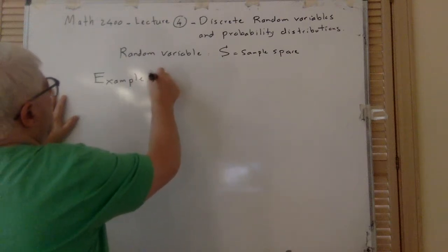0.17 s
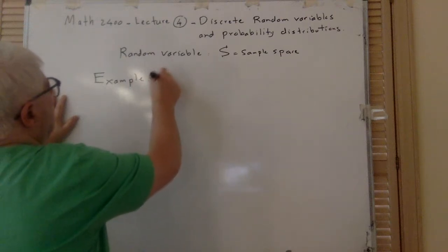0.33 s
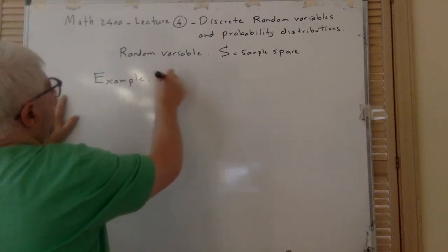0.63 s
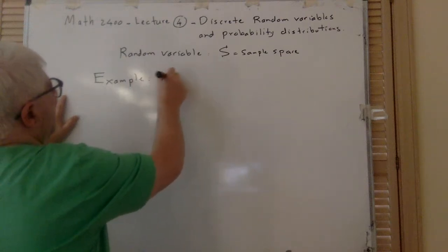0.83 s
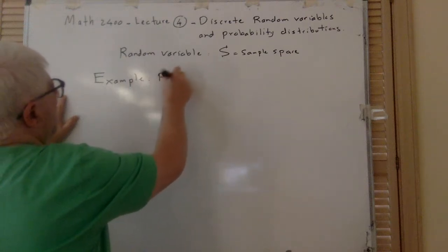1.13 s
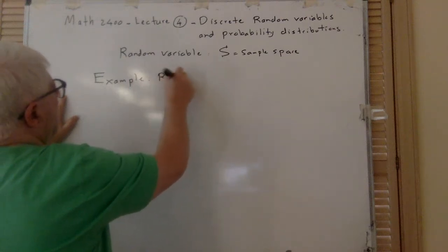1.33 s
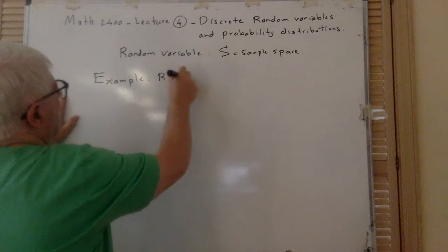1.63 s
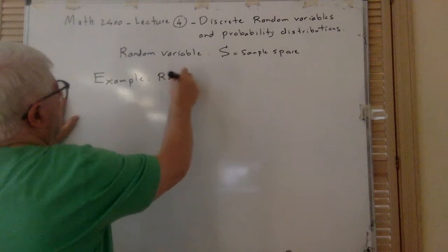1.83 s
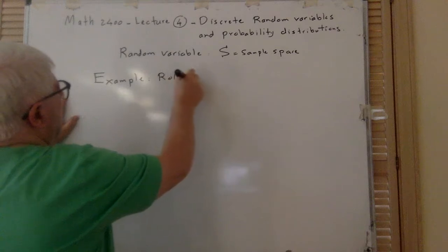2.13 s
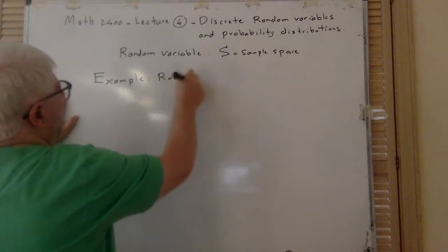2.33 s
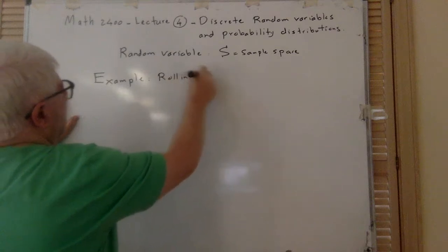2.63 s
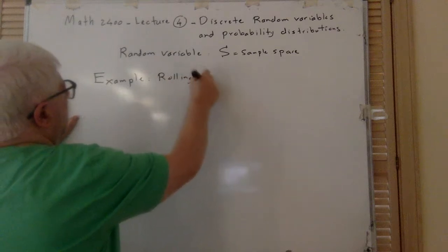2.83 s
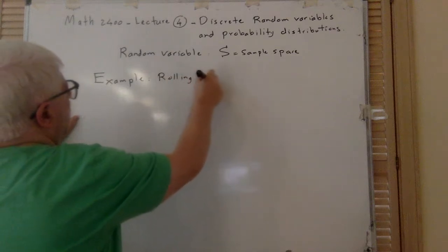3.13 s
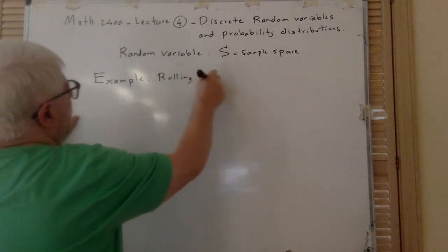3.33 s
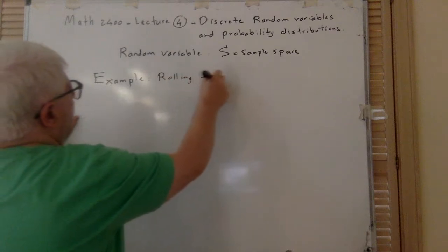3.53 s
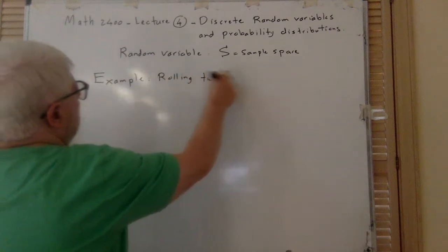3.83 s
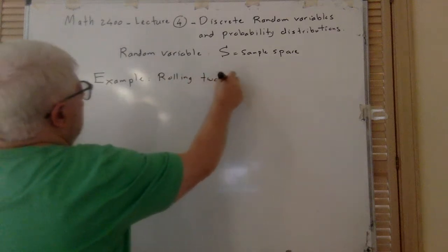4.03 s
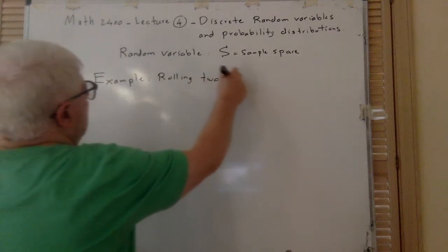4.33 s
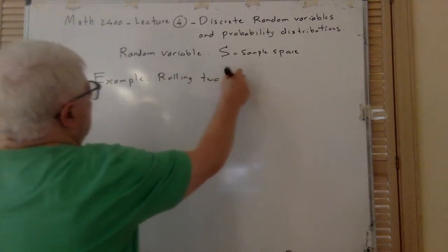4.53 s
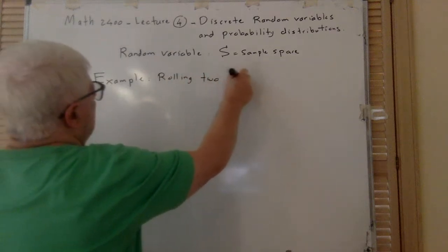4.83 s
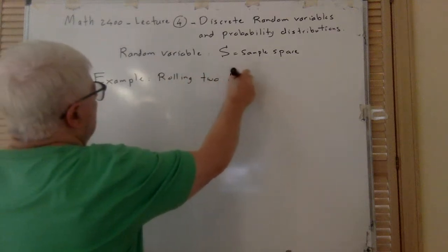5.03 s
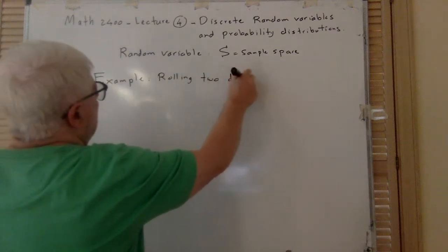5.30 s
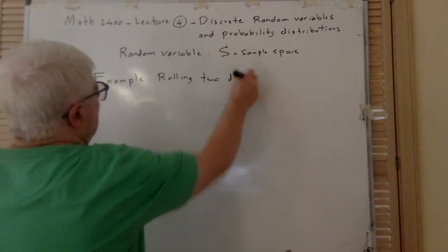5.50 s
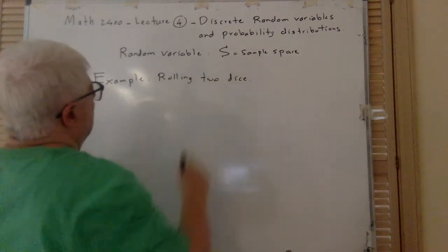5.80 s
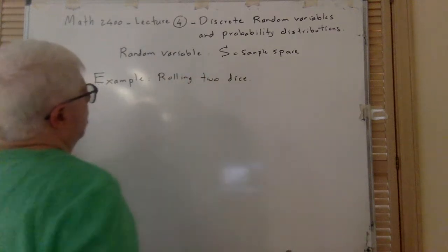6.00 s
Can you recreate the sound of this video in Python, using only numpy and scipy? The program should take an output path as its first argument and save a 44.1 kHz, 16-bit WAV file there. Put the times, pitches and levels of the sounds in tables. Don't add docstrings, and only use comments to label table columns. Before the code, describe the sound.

Soft then firmer marker taps knock a loose whiteboard, with brief scratchy strokes between, ending in a small plastic cap click.

```python
import sys
import numpy as np
from scipy import signal
from scipy.fft import rfft, irfft
from scipy.io import wavfile
from scipy.ndimage import uniform_filter1d

SR = 44100
rng = np.random.default_rng(int(sys.argv[2]) if len(sys.argv) > 2 else 0)


def to_wav(sig):
    pcm = np.clip(np.atleast_2d(sig), -1, 1) * 32767
    pcm = np.round(pcm).astype(np.int16)
    wavfile.write(sys.argv[1], SR, pcm.T)


def magnitude_from_level(level_db):
    exponent = np.asarray(level_db, float) / 20
    return 10 ** exponent


N = 271643

# start_s, thud_db, upper_modes_db, knock_db (frame, over the thud), fall_db_per_s
TAPS = [(0.179, -50, -36, -45, 70.5), (0.198, -45, -40, -47, 68), (0.626, -39, -19.5, -58, 57),
        (0.646, -43, -25, -30, 60), (0.983, -26.5, -25, -44, 72), (1.223, -27.5, -26, -41.5, 74),
        (1.457, -23, -19.5, -41.5, 60.5), (1.627, -34, -27, -34, 83), (1.774, -33, -30, -31, 59),
        (2.058, -57.5, -20.5, -32, 60), (2.662, -19, -21, -17.5, 39), (2.907, -22, -17, -38, 40),
        (3.084, -24, -22, -17, 45), (3.505, -38, -23, -30.5, 46), (3.958, -24, -18, -11, 42.5),
        (4.475, -41, -30.5, -28.5, 61), (4.678, -24, -17.5, -13.5, 43), (4.848, -27, -16, -8, 38),
        (5.093, -46, -15.5, -18, 19), (5.431, -22.5, -19, -11.5, 40)]


def colour(table, hz):
    rows = np.array(table, float)
    return [np.interp(np.log(hz), np.log(rows[:, 0]), column) for column in rows[:, 1:].T]


def shaped(x, db):
    hz = np.maximum(np.fft.rfftfreq(len(x), 1 / SR), 1)
    return irfft(rfft(x) * magnitude_from_level(db(hz)), len(x))


def unit(x):
    return x / np.sqrt(np.mean(x ** 2))


def band(x, lo_hz, hi_hz):
    sos = signal.butter(4, [lo_hz, min(hi_hz, .45 * SR)], "band", fs=SR, output="sos")
    return signal.sosfilt(sos, x)


def add(out, start_s, x):
    i = int(start_s * SR)
    out[i:i + len(x)] += x[:len(out) - i]


def ring(hz, t60_s, rise_s=.001, length_s=0.65):
    t = np.arange(int(length_s * SR)) / SR
    return np.sin(2 * np.pi * hz * t) * (1 - np.exp(-t / rise_s)) * magnitude_from_level(-60 * t / t60_s)


def walk(rate_hz):
    k = int(SR / rate_hz)
    steps = np.repeat(rng.standard_normal(N // k + 1), k)
    return unit(uniform_filter1d(uniform_filter1d(steps, k), k)[:N])


def breathe_db(t):
    quiet_db, swell_db, swell_s = -2.5, 5, 0.33
    opening = 0
    for start_s, db, _, knock_db, _ in TAPS:
        loudness = np.clip((db + knock_db + 74) / 35, 0, 1)
        opening = opening + loudness * (t > start_s) * np.exp(-np.abs(t - start_s) / swell_s)
    return quiet_db + swell_db * opening


def fan():
    # pitch_hz, level_db (per Hz)
    air_spectrum = [(20, -46.5), (50, 0), (80, -2), (130, 4.5), (240, -2.5), (350, -6.5), (560, -17),
                    (1100, -12.5), (2000, -20), (6800, -28.5), (7500, -38), (14200, -40), (15300, -57.5)]
    # pitch_hz, level_db
    hum_tones = [(120, -82), (240, -78), (481, -88)]
    t = np.arange(N) / SR
    air = unit(shaped(rng.standard_normal(N), lambda hz: colour(air_spectrum, hz)[0]))
    out = air * magnitude_from_level(-68 + 0.99 * walk(2) + breathe_db(t))
    for hz, db in hum_tones:
        out = out + magnitude_from_level(db + 4.0 + 2.0 * walk(5.1)) * np.sin(2 * np.pi * hz * t)
    return out


def tail(wet_db, build_s):
    # pitch_hz, t60_s, level_db
    room_decay = [(93, 0.57, 0), (300, 0.64, -2), (1000, 0.72, 10), (2950, 0.52, 7.5), (7760, 0.92, -17.5)]
    t = np.arange(int(.9 * SR)) / SR
    out = np.zeros(len(t))
    for hz in 57.86 * 2. ** np.arange(8):
        t60_s, db = colour(room_decay, hz)
        octave = band(rng.standard_normal(len(t)), hz / np.sqrt(2), hz * np.sqrt(2))
        out += octave * magnitude_from_level(wet_db + db - 60 * t / t60_s)
    return out * (1 - np.exp(-(t / build_s) ** 2))


def room(x, echoes):
    return x + signal.fftconvolve(x, echoes)[:len(x)]


def stroke_db():
    # start_s, hold_s, hiss_db, fade_db_per_s
    strokes = [(0.415, 0.059, -71.5, 62), (0.665, .02, -69, 59), (.99, 0.043, -73, 70),
               (1.25, .05, -73.5, 75), (1.486, .06, -68.5, 24), (2.662, 0.017, -59.5, 48.5),
               (2.915, 0.24, -65, 51), (3.51, 0.04, -78, 49), (3.966, 0.19, -62.5, 68),
               (4.69, 0.15, -65, 90), (4.853, 0.024, -61.5, 34), (5.448, 0.13, -60.5, 47),
               (5.975, 0.11, -67.5, 49), (6.096, .06, -55.5, 60)]
    rest_db, rise_s = -80.5, 0.018
    t, power = np.arange(N) / SR, magnitude_from_level(2 * rest_db)
    for start_s, hold_s, db, fade_db in strokes:
        rise = np.clip((t - start_s) / rise_s, 0, 1)
        fade = magnitude_from_level(db - fade_db * np.maximum(t - start_s - hold_s, 0))
        power = power + (rise * fade) ** 2
    return 10 * np.log10(power)


def felt():
    hiss_db = stroke_db()
    air_db = -83 + 0.58 * (hiss_db + 60.5)
    hiss = unit(band(rng.standard_normal(N), 2620, 6510)) * magnitude_from_level(hiss_db - 9.5 + 1.3 * walk(40))
    air = unit(band(rng.standard_normal(N), 7400, 15200)) * magnitude_from_level(air_db + 0.66 * walk(40))
    return hiss + air


def plastic():
    # pitch_hz, level_db, t60_s
    cap_modes = [(2520, 2.5, 0.021), (3374, 5, 0.028), (5860, -7, 0.033), (7200, -16, 0.058),
                 (8000, -10, 0.02), (9400, -16, 0.017)]
    snap_s, snap_db = 6.103, -44.5
    out = np.zeros(N)
    for hz, db, t60_s in cap_modes:
        add(out, snap_s - .002, magnitude_from_level(snap_db + db + 4.5) * ring(hz, t60_s, rise_s=0.0046))
    return out


def barrel():
    # start_s, level_db, pitch_hz, t60_s
    scrapes = [(0.442, -78.5, 2740, 0.76), (.66, -66.5, 1000, 0.38), (.688, -65, 1000, .1),
               (0.687, -76, 4500, .03), (.76, -70, 1040, .13), (1.47, -56, 1000, 0.12),
               (1.564, -69, 2800, 0.047), (1.632, -58.5, 975, 0.053), (1.791, -61.5, 1110, 0.34),
               (4.14, -58.5, 1840, 0.36), (4.2, -67.5, 1980, 0.21), (4.474, -66, 1370, 0.044),
               (5.091, -48.5, 1260, 0.041), (5.102, -47, 1310, 0.052), (5.999, -77.5, 2470, 0.3),
               (6.102, -71, 1514, 0.49), (6.103, -74, 4340, .2), (6.126, -64, 7100, 0.13),
               (6.135, -61.5, 280, .2)]
    # start_s, level_db, pitch_hz,
    # t60_s
    squeaks = [(0.35, -80, 1600, 0.17), (0.431, -60, 2010, 0.035), (2.22, -79.5, 2180, 0.6),
               (2.669, -74, 7000, .2), (2.682, -69, 5320, .1), (3.008, -63.5, 3280, 0.072),
               (3.983, -65, 7070, .1), (4.033, -59, 4220, 0.047), (4.985, -55.5, 3300, 0.05),
               (5.04, -55, 1590, 0.056), (5.502, -58, 6050, 0.05), (5.499, -67.5, 10250, .06),
               (5.619, -51.5, 1680, 0.059), (6.025, -72, 6900, 0.061)]
    bursts = []
    for start_s, db, _, knock_db, _ in TAPS:
        ring_db = db - 36 - 0.3 * (knock_db + 39.5)
        bursts.append((start_s + 0.0035, ring_db, 654, .1, 0.41 * 654))
    for start_s, db, hz, t60_s in scrapes:
        bursts.append((start_s, db, hz, t60_s, 0.41 * hz))
    for start_s, db, hz, t60_s in squeaks:
        bursts.append((start_s, db, hz, t60_s, 280))
    out, t = np.zeros(N), np.arange(int(.4 * SR)) / SR
    for start_s, db, hz, t60_s, width_hz in bursts:
        scratch = unit(band(rng.standard_normal(len(t)), hz - width_hz / 2, hz + width_hz / 2))
        add(out, start_s, magnitude_from_level(db + 1.5 - 60 * t / t60_s) * (1 - np.exp(-t / 0.00088)) * scratch)
    return out


def jolts():
    # start_s, level_db, pitch_hz
    tip_jolts = [(0.196, -46, 148), (0.24, -56, 126), (0.648, -48, 150), (0.685, -49.5, 150),
                 (1.078, -41.5, 287), (1.552, -34.5, 285), (1.811, -33, 183), (2.07, -54, 144),
                 (3.012, -30.5, 325), (3.497, -36, 180), (3.599, -44.5, 315), (4.063, -29, 295),
                 (4.099, -34, 307), (4.479, -47, 160), (4.585, -57, 149), (4.82, -39, 256),
                 (4.952, -32.5, 306.3), (5.499, -27, 300), (5.534, -28.5, 307), (5.615, -34.5, 298)]
    out = np.zeros(N)
    for start_s, db, hz in tip_jolts:
        add(out, start_s, magnitude_from_level(db - 2) * ring(hz, 0.092, rise_s=0.0015))
    return out


def thud(db, upper_db, deep_db, t):
    # pitch_hz, level_db, t60_s
    panel_modes = [(58.6, -18, 0.21), (88.7, -9.5, 0.28), (121.6, -3, 0.54), (169.2, 12.5, 0.2),
                   (181, -1.5, 0.23), (223.7, -7.5, 0.073), (244, -22.5, 0.084), (307, -7, 0.65),
                   (332.5, -4, 0.32), (379.4, -7.5, 0.12), (421.3, -4.5, 0.082), (478.7, -10, 0.13),
                   (577.4, -15, 0.091), (632, -16.5, 0.038), (696, -43.5, 0.13)]
    flex = np.sin(2 * np.pi * 235 * t) * (t / 0.0034) ** 2 * np.exp(-t / 0.0019)
    out = -magnitude_from_level(db + 13.5) * flex
    for (hz, mode_db, t60_s), c in zip(panel_modes, rng.standard_normal(len(panel_modes))):
        near_db = upper_db + 25 if 280 < hz < 450 else deep_db if hz < 150 else 0
        level = magnitude_from_level(db - 19.0 + mode_db + near_db + 0.83 * c) * np.sign(c)
        add(out, .007, level * ring(hz, t60_s, rise_s=0.0012))
    return out


def knock(db, bright_db, t):
    # pitch_hz, level_db (per Hz)
    knock_spectrum = [(320, -27.5), (550, -10), (778, -5), (1180, -0.5), (1250, -0.5), (1350, -4.5),
                      (1590, -2.5), (2060, -9.5), (3050, -9.5), (3690, -28), (6110, -62.5), (7230, -73),
                      (8000, -59), (10400, -59.5), (17600, -120)]
    # pitch_hz, level_db, t60_s
    tray_modes = [(1275, -5.5, 0.056), (1790, -8.5, .05), (2690, -19, 0.074), (3300, -10.5, 0.03),
                  (4070, -36, 0.047)]

    def tone_db(hz):
        tilt = np.clip(np.log2(hz / 1500), 0, 1)
        return colour(knock_spectrum, hz)[0] + (bright_db + 4.5) * tilt

    noise, grit = rng.standard_normal((2, len(t)))
    late = np.maximum(t - .002, 0)
    decay = np.exp(-late / 0.0042) + 0.49 * np.exp(-late / 0.15)
    rattle = noise * magnitude_from_level(2.44 * grit) * (1 - np.exp(-late / 0.0014)) * decay
    out = magnitude_from_level(db - 17.0) * unit(shaped(rattle, tone_db)) * np.clip(t / 0.0025, 0, 1) ** 2
    for (hz, tray_db, t60_s), c in zip(tray_modes, rng.standard_normal(len(tray_modes))):
        level = magnitude_from_level(db + tray_db + 2.5 + 4.4 * c)
        add(out, .004, level * ring(hz * (1 + 0.017 * c), t60_s, rise_s=.002))
    return out


def reducer(x, fall_db):
    # pitch_hz, hold_s
    hold_times = [(100, 0.06), (300, 0.11), (1000, 0.1), (2000, 0.086), (3500, 0.022), (8000, 0.09)]
    hz, t, frames = signal.stft(x, SR, nperseg=512)
    hold_s = colour(hold_times, np.maximum(hz, 1))[0][:, None]
    over_s = t - hold_s * 120 / fall_db
    return signal.istft(frames * magnitude_from_level(-np.clip(fall_db * over_s, 0, 14)), SR)[1][:len(x)]


def board(tails):
    out, t = np.zeros(N), np.arange(int(.9 * SR)) / SR
    for start_s, db, upper_db, knock_db, fall_db in TAPS:
        bright_db = max(2 + 0.7 * knock_db, -10.5)
        deep_db = -.25 * (knock_db + 24.0)
        turn = rng.uniform(0, np.pi / 2)
        echoes = np.cos(turn) * tails[0] + np.sin(turn) * tails[1]
        boom = room(thud(db, upper_db, deep_db, t), echoes)
        landing = boom + knock(db + knock_db, bright_db, t)
        add(out, start_s + 0.001062, reducer(landing, 2.73 * fall_db))
    return out


def scene():
    tails = [tail(wet_db=-32, build_s=0.017) for _ in range(2)]
    marker = room(barrel(), magnitude_from_level(-18) * tails[1])
    marker = marker + room(jolts(), magnitude_from_level(-8.5) * tails[0])
    marker = marker + room(plastic(), magnitude_from_level(-4.0) * tails[0])
    return (fan() + felt() + marker + board(tails))[None]


def top_cut(x):
    return signal.sosfilt(signal.butter(12, 15610, fs=SR, output="sos"), x)


def record(dry):
    mic = signal.sosfilt(signal.butter(2, 60, "high", fs=SR, output="sos"), dry)
    return top_cut(mic)


dry = scene()
out = record(dry)
to_wav(out)
```